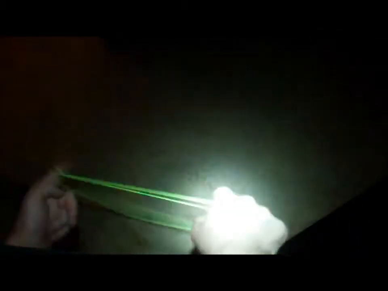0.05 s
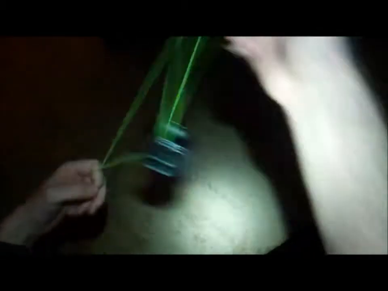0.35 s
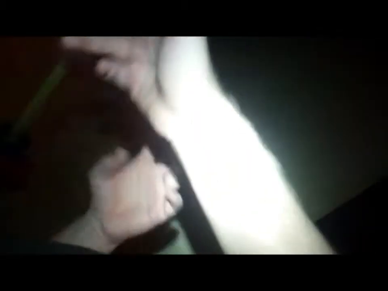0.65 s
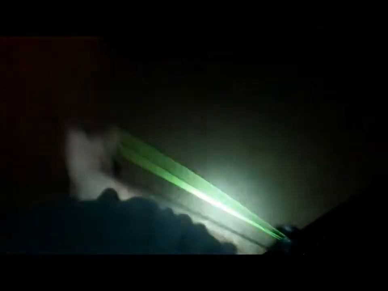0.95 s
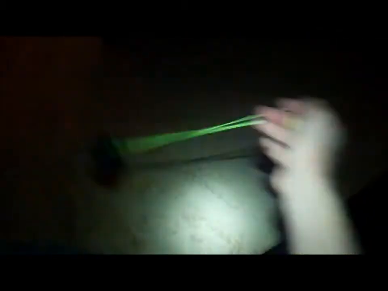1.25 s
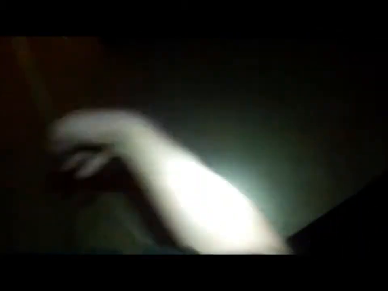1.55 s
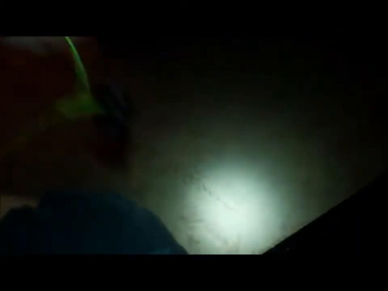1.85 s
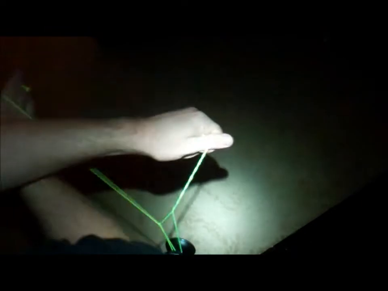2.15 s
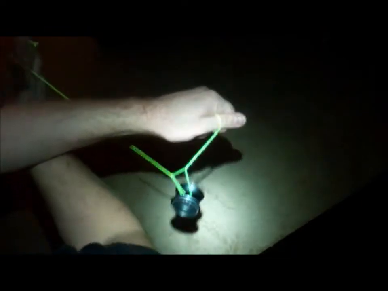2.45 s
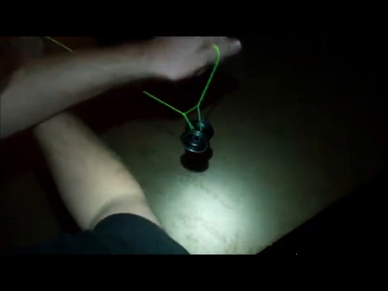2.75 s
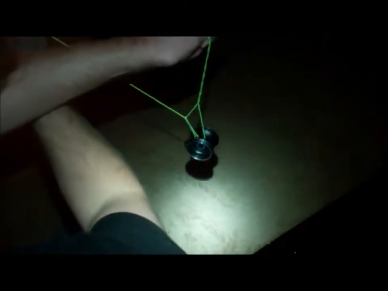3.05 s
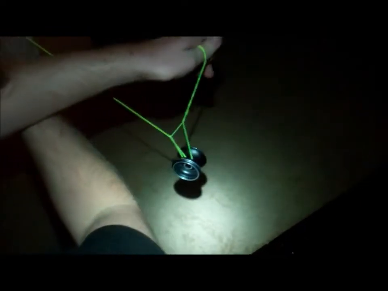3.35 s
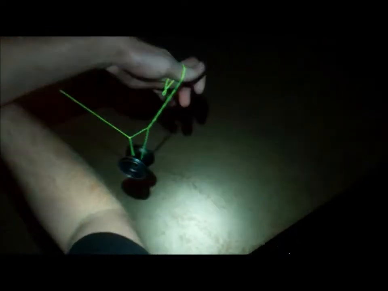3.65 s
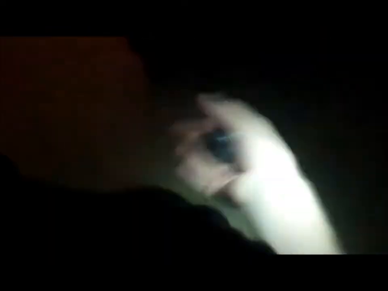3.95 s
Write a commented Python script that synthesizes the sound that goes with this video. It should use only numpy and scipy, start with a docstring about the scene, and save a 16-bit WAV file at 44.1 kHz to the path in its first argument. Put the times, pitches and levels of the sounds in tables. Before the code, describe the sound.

Close to the microphone in a faintly humming room, a metal yo-yo whirs unevenly on its string, swings free with soft bearing chatter, then lands and hisses steadily. It stops abruptly, followed by light taps and a bump.

```python
"""A metal yo-yo in a quiet, humming room, close to a stereo microphone pair and to its left.
First come string tricks: the string rubs in the gap with a grainy hiss whose resonances move with the
wraps, slides over the fingers and makes the rims ring. From 1.3 s the yo-yo swings free: only the
bearing chatters and the rims sing. At 1.9 s it lands on the string with a chirp and hangs there hissing,
until the sound stops short at 3.8 s. Two light taps and a small bump follow."""
import sys
import numpy as np
from scipy import signal
from scipy.fft import rfft, irfft
from scipy.io import wavfile
from scipy.ndimage import uniform_filter1d

SR = 44100
rng = np.random.default_rng(int(sys.argv[2]) if len(sys.argv) > 2 else 0)


def file_out(sig):
    """Save sig as 16-bit WAV at sys.argv[1]."""
    # one column per channel
    cols = np.atleast_2d(sig).T
    # limit, then scale
    lim = np.clip(cols, -1, 1)
    pcm = np.round(lim * 32767).astype(np.int16)
    wavfile.write(sys.argv[1], SR, pcm)


N = 176400
T = np.arange(N) / SR
BIN_HZ = np.arange(N // 2 + 1) * SR / N
SIDES = np.array([[1], [-1]])   # left, right


def from_db(db):
    """Decibels to gain."""
    return 10 ** (np.asarray(db) / 20)


def unit_rms(x):
    """Scale to an rms of 1."""
    return x / np.sqrt(np.mean(x ** 2) + 1e-20)


def in_time(rows):
    """Each column after time_s, interpolated to every sample."""
    times, *columns = np.transpose(rows)
    return [np.interp(T, times, column) for column in columns]


def at_hz(spectrum, hz):
    """Read a spectrum on a log-frequency axis."""
    freqs, values = np.transpose(spectrum)
    return np.interp(np.log(hz + 1e-9), np.log(freqs), values)


def gate(start_s, end_s, rise_s, fall_s):
    """Straight attack, hold and release."""
    return np.clip((T - start_s) / rise_s, 0, 1) * np.clip((end_s - T) / fall_s, 0, 1)


def noise():
    """Two unrelated white noises."""
    return rng.standard_normal((2, N))


def drift(rate_hz):
    """Smooth random wander, rms 1."""
    return unit_rms(irfft(rfft(rng.standard_normal(N)) / (1 + (BIN_HZ / rate_hz) ** 2), N))


def grain(rate_hz, depth_db):
    """A randomly flickering gain with capped peaks."""
    return from_db(depth_db * np.minimum(drift(rate_hz), 2))


def narrow_noise(hz, half_width_hz):
    """A randomly driven resonance, steady or gliding; rms 1."""
    phase = 2 * np.pi * np.cumsum(hz + np.zeros(N)) / SR
    return drift(half_width_hz) * np.cos(phase) + drift(half_width_hz) * np.sin(phase)


def moving_resonance(hiss, hz, height_db, width_hz=1300, block=256):
    """Raise or lower a band of the hiss whose centre moves block by block."""
    band, state = np.zeros_like(hiss), np.zeros((2, 2))
    radius = np.exp(-np.pi * width_hz / SR)
    b = np.array([1, 0, -1]) * (1 - radius ** 2) / 2
    for i in range(0, N, block):
        a = [1, -2 * radius * np.cos(2 * np.pi * hz[i] / SR), radius ** 2]
        band[:, i:i + block], state = signal.lfilter(b, a, hiss[:, i:i + block], zi=state)
    return hiss + (from_db(height_db) - 1) * band


# Balance at the microphone pair: freq_hz, left_over_right_db
MIC_BALANCE = [(100, 4.5), (1000, 3.5), (2500, 3.5), (5000, 8), (7000, 7.5), (8300, 14.5), (9600, 11.5),
               (10800, 16), (12000, -9), (14000, 1)]
def pan(hz):
    """Left and right gains at a frequency, averaging 1."""
    gains = from_db(SIDES * at_hz(MIC_BALANCE, hz) / 2)
    return gains / gains.mean(0)


# How alike the two microphones sound: freq_hz, correlation
MIC_LIKENESS = [(30, 0.29), (120, 0.64), (280, 0.47), (550, 0.28), (1200, 0.29), (5000, 0.51), (7000, 0.64),
                (9500, 0.11), (13000, 0.73)]
def at_microphones(pair, colour):
    """Colour two unrelated noises and spread them over the microphones as mid and side."""
    alike = np.clip(at_hz(MIC_LIKENESS, BIN_HZ), 0, .99)
    mid, side = rfft(pair)
    spread = np.sqrt((1 + alike) / 2) * mid + np.sqrt((1 - alike) / 2) * side * SIDES
    tone = unit_rms(from_db(at_hz(colour, BIN_HZ)))
    return irfft(tone * pan(BIN_HZ) * spread, N)


# Air of the room: freq_hz, relative_db
AIR_COLOUR = [(25, -1.5), (55, -2), (85, -2), (130, -0.5), (200, 0.5), (320, -1.5), (450, -3), (800, -5),
              (1400, -4.5), (2000, -8.5), (3500, -8), (7000, -9.5), (11000, -15.5), (14000, -43)]
# Its rise and fall: time_s, level_db
AIR_LEVEL = [(0, -62.5), (.4, -57.5), (1.0, -56.5), (1.6, -54), (2.7, -53.5), (3.4, -55.5), (3.78, -55.5),
             (3.83, -61.5), (4, -58.5)]
# Mains and fan hum: pitch_hz, average_level_db
HUM_TONES = [(55, -81), (120, -66), (162, -74), (256, -67), (298, -79), (323, -74.5)]
def room():
    """Dull air noise and the hum of mains and fan swell and sink together around the microphones."""
    level_db, = in_time(AIR_LEVEL)
    hum = 0
    for hz, db in HUM_TONES:
        amplitude = np.sqrt(2) * from_db(db + drift(5.5))
        hum += amplitude * np.sin(2 * np.pi * hz * T + 0.34 * drift(1.4)) * pan(hz)
    air = at_microphones(noise(), AIR_COLOUR) * from_db(level_db)
    return air + hum * from_db(level_db - level_db.mean())


def string_rub(path, low_path, colour, low_width_hz):
    """Fibres catch on the spinning gap: grainy hiss, chopped by the spin, with two moving resonances."""
    level_db, high_hz, pan_db, high_db = in_time(path)
    low_hz, low_db = in_time(low_path)
    flutter_hz = 372.6 - 9.9 * T + 4 * drift(4.26)   # sags as the spin slows
    flutter = 1 + 0.12 * np.sin(2 * np.pi * np.cumsum(flutter_hz) / SR)
    grains = unit_rms(grain(rate_hz=700, depth_db=2) * flutter)
    hiss = moving_resonance(at_microphones(noise(), colour), high_hz, high_db)
    hiss = moving_resonance(hiss, low_hz, low_db, low_width_hz)
    hiss *= from_db(SIDES * (pan_db - 9) / 2)   # 9 dB keeps the usual lean to the left
    running_rms = np.sqrt(uniform_filter1d(hiss.mean(0) ** 2, size=2000))
    return hiss / running_rms * grains * from_db(level_db)


# Rub of the first and second trick: time_s, level_db, resonance_hz, pan_db, height_db
FIRST_TRICK = [(0.0, -49, 9000, 11, 14), (0.12, -52, 9300, 17, 24), (0.135, -52, 8900, 11, 9),
               (0.16, -45.5, 8900, 8, 6), (0.21, -47, 8900, 9, -12), (0.265, -43.5, 8200, 10, 12),
               (0.31, -45.5, 7760, 10, 10), (0.355, -40, 8950, 9, 12.5), (0.395, -43.5, 7640, 8, 2),
               (0.436, -42.5, 7300, 6.5, 11), (0.472, -53, 7330, 9, 5), (0.51, -44.5, 7400, 10, 0),
               (0.58, -44.5, 7500, 9, 5), (0.62, -42.5, 9200, 10, 5), (0.65, -42, 9200, 8, 1),
               (0.683, -39, 9400, 10, 12.5), (0.726, -42.5, 6660, 8, 2), (0.784, -56, 7900, 15, 13),
               (0.82, -56, 6800, 7, 8)]
SECOND_TRICK = [(0.82, -55, 6750, 8.5, 3), (0.86, -47, 6900, 9.3, 12), (0.906, -44.5, 7500, 6, 11),
                (0.97, -43, 7300, 6.2, 10), (1.046, -40, 8350, 8.4, 7), (1.12, -42, 8200, 7.6, 12),
                (1.18, -43.5, 9100, 7.5, 6.5), (1.226, -45.5, 9000, 7.1, 7), (1.282, -35.5, 8350, 10, 9.2),
                (1.33, -51, 7630, 5.3, 2.2)]
# Its lower resonance: time_s, resonance_hz, height_db
TRICK_LOW_RESONANCE = [(0.12, 7500, -5), (0.17, 7200, -6), (0.2, 6200, 4), (0.24, 5000, 4),
                       (0.35, 4940, 11.5), (0.44, 5300, -11), (0.49, 5100, 5), (0.54, 5200, 9),
                       (0.62, 5440, -2), (0.68, 5600, -1), (0.735, 5300, 3), (0.83, 6000, 0),
                       (0.9, 6460, 3), (0.96, 6200, 10), (1.0, 4960, 6), (1.06, 5100, 3), (1.12, 6230, 7),
                       (1.19, 5800, -4), (1.28, 6900, 7)]
# Its hiss: freq_hz, relative_db
TRICK_HISS = [(1000, -20.5), (2200, -13), (3000, -6), (4000, -7.5), (5000, 0.5), (5900, -3), (7800, -1.5),
              (9300, -1), (10100, -5.5), (11000, -14), (12300, -20), (14000, -31)]
def tricks():
    """The string rubs in the gap through two tricks, its resonances moving with the wraps."""
    path = list(FIRST_TRICK) + list(SECOND_TRICK)[1:]
    fade = np.clip((path[-1][0] - T) / 0.019, 0, 1)
    return string_rub(path, TRICK_LOW_RESONANCE, TRICK_HISS, low_width_hz=690) * fade


# Rolling of the bearing: time_s, relative_db, resonance_hz
BEARING_ROLL = [(0, -46, 9100), (.7, -48.5, 9100), (.82, -54.5, 9000), (1.3, -47, 9100), (1.5, -45, 9200),
                (1.62, -46.5, 7800), (1.75, -44.5, 7300), (1.85, -46.5, 7600), (1.91, -54, 7600),
                (2.0, -47, 7900), (3.8, -46.5, 9100)]
# Its hiss: freq_hz, relative_db
BEARING_HISS = [(1000, -24), (2200, -11.5), (3000, -6), (4000, -10), (5000, -3.5), (5800, -5.5), (7200, -1),
                (8400, -0.5), (9200, 3), (10000, -5), (11000, -22), (14000, -23)]
# Its sharp clicks: start_s, relative_db
BEARING_CLICKS = [(0.0352, -34), (0.156, -30), (0.4309, -39), (0.7623, -25), (1.389, -32), (1.4206, -37),
                  (1.4446, -38), (1.4654, -22), (1.487, -34), (1.5119, -41), (1.526, -27), (1.5396, -22),
                  (1.5794, -22), (1.6296, -30), (1.7453, -23), (1.8624, -25.5)]
# Their colour: freq_hz, relative_db
CLICK_SPECTRUM = [(1000, -19), (4000, -19), (7200, 3), (9200, 1), (11000, -20), (14000, -28)]
def bearing(roll_gain_db=-3.5, click_gain_db=-9, click_decay_s=0.00087):
    """The balls roll with a softly chattering hiss and small clicks."""
    level_db, hz = in_time(BEARING_ROLL)
    chatter = unit_rms(grain(rate_hz=253, depth_db=3.5))
    hiss = moving_resonance(at_microphones(noise(), BEARING_HISS), hz, height_db=0.5)
    roll = hiss / hiss.mean(0).std() * chatter * from_db(level_db + roll_gain_db)
    clicks = sum(from_db(db + click_gain_db) * (T >= start) * np.exp(-np.abs(T - start) / click_decay_s)
                 for start, db in BEARING_CLICKS)
    return roll + at_microphones(clicks * noise(), CLICK_SPECTRUM)


# String passing over the fingers: peak_s, rise_s, fall_s, level_db
SWISHES = [(.04, 0.086, 0.063, -51.5), (.34, 0.024, 0.015, -49.5), (.622, 0.011, 0.0091, -44.5),
           (.683, 0.013, 0.011, -43.5), (1.265, 0.078, 0.021, -44.5), (1.946, .011, 0.021, -42)]
# Their colour: freq_hz, relative_db
SWISH_COLOUR = [(500, -23.5), (1200, -10.5), (1700, -9.5), (2700, 1), (3600, -1.5), (5000, -19), (9000, 1),
                (13000, -23)]
# Zips of the running string: start_s, length_s, start_hz, end_hz, half_width_hz, level_db
STRING_ZIPS = [(0, 0.099, 1710, 1636, 49.7, -57.5), (.13, 0.12, 1630, 1525, 95, -61.5),
               (0.319, 0.084, 1250, 1084, 90, -62.5), (0.666, 0.04, 1750, 1655, 230, -49),
               (1.021, 0.2, 1134, 1234, 45, -64), (1.145, 0.1496, 1420, 1533, 94.5, -54),
               (2.693, 0.81, 1247, 1253, 30, -68), (3.452, 0.31, 1480, 1457, 60, -69.5)]
def finger_slides():
    """String runs over skin: short swishes, lower than the rub, and narrow gliding zips."""
    swell = sum(from_db(db) * np.exp(-((T - peak) / np.where(T < peak, rise, fall)) ** 2 / 2)
                for peak, rise, fall, db in SWISHES)
    sound = at_microphones(noise() * swell * from_db(2 * drift(400)), SWISH_COLOUR)
    for start, length, start_hz, end_hz, half_width, db in STRING_ZIPS:
        span = [start, start + length]
        tone = narrow_noise(np.interp(T, span, [start_hz, end_hz]), half_width)
        sound += tone * from_db(db) * gate(*span, rise_s=0.21 * length, fall_s=0.037) * pan(start_hz)
    return sound


# Modes of the metal rims: pitch_hz, width_hz, level_db, share_of_friction_swing
RIM_RESONANCES = [(3413, 66, -63, 0.35), (4460, 61, -60, 0.59), (5044, 110, -59, 0.3),
                  (9000, 260, -71, 0.18)]
def rim_song(friction):
    """Friction keeps the rim modes singing, louder as it grows."""
    power = uniform_filter1d(unit_rms(friction.mean(0)) ** 2, size=900)
    swing_db = 10 * np.log10(power.clip(1e-6))
    return sum(narrow_noise(hz, width / 2) * from_db(db + share * swing_db) * pan(hz)
               for hz, width, db, share in RIM_RESONANCES)


# String brushing a rim: start_s, length_s, level_db
RIM_BRUSHES = [(0.022, 0.036, -53.5), (.11, .03, -59), (0.187, .05, -62), (0.298, 0.022, -57),
               (0.34, 0.039, -53), (0.518, .02, -56), (0.667, 0.022, -51), (0.787, 0.044, -63),
               (0.94, 0.019, -53.5), (1.03, 0.029, -57), (1.11, .045, -54), (1.163, 0.013, -48.5),
               (1.198, 0.011, -44.5), (1.25, .035, -52), (1.946, .025, -54.5), (2.06, .03, -58),
               (2.11, 0.042, -52), (2.18, 0.033, -61), (2.237, 0.027, -62), (3.297, 0.1, -56),
               (3.467, .02, -55), (3.547, 0.019, -52.5), (3.673, 0.017, -69)]
def rim_flares(rise_s=0.0066, t60_s=0.11):
    """Each brush of the string bows the lowest rim mode into a wavering note that rings out."""
    hz = RIM_RESONANCES[0][0]
    swell = 0
    for start, length, db in RIM_BRUSHES:
        decay_db = 60 * np.maximum(T - start - length, 0) / t60_s
        swell += from_db(db - decay_db) * np.clip((T - start) / rise_s, 0, 1)
    phase = 2 * np.pi * np.cumsum(hz + 22.1 * drift(44.4)) / SR
    chatter = from_db(2 * drift(90))
    return np.sqrt(2) * swell * chatter * np.sin(phase) * pan(hz)


# Rub while hanging on the string: time_s, relative_db, resonance_hz, pan_db, height_db
HANG_RUB = [(1.935, -36, 7600, 8.4, 3), (1.98, -42, 7060, 11, 18), (2.025, -39.5, 6900, 6.9, 23),
            (2.06, -39, 7240, 7.1, 10), (2.115, -39, 8240, 7, 17), (2.18, -39.5, 7340, 6.9, 4),
            (2.275, -39.5, 7000, 7.9, 22.5), (2.35, -39, 6850, 7.9, 2.5), (2.415, -40.5, 6400, 8.8, 5.5),
            (2.515, -36.5, 6900, 6.7, 8), (2.581, -38.5, 6700, 8.1, 9.5), (2.66, -38, 6840, 7.6, 11),
            (2.73, -37.5, 6500, 9.8, 10), (2.805, -36.5, 6500, 8.9, 13), (2.83, -38.5, 6500, 8.2, 9),
            (2.885, -37.5, 6300, 8.7, 6), (2.93, -40, 6800, 8.3, -2), (3.079, -40.5, 7140, 8.6, 0.5),
            (3.235, -39.5, 7360, 8.4, 6.5), (3.32, -40, 7200, 9.5, 4), (3.39, -41, 7000, 9, 6),
            (3.44, -41, 6670, 8.3, 12), (3.545, -38.5, 7200, 8.5, 1), (3.607, -42.5, 7450, 8.2, 9),
            (3.649, -42.5, 6760, 8.2, 1), (3.7, -40.5, 7400, 9.6, -4), (3.757, -44.5, 7260, 9, -9),
            (3.8, -42, 7350, 10, 7)]
# Its lower resonance: time_s, resonance_hz, height_db
HANG_LOW_RESONANCE = [(1.94, 5000, 3), (2.06, 5200, 2), (2.28, 5670, -5.5), (2.39, 5700, 4),
                      (2.522, 5800, 2.5), (2.62, 5900, -1), (2.8, 5760, 3), (2.95, 5600, 5),
                      (3.08, 5300, 7), (3.2, 5340, 7.5), (3.342, 5500, 7), (3.43, 5400, -0.5),
                      (3.8, 5500, 3)]
# Its hiss: freq_hz, relative_db
HANG_HISS = [(1000, -28.5), (2200, -17.5), (3200, -18.5), (4000, -6.5), (4900, -1.5), (6000, -0.5),
             (7500, 1), (8600, -4), (9600, 4.5), (10400, -6), (11300, -15), (14000, -34)]
def hang(gain_db=1):
    """The yo-yo spins on the string, which rubs steadily in the gap."""
    return string_rub(HANG_RUB, HANG_LOW_RESONANCE, HANG_HISS, low_width_hz=1100) * from_db(gain_db)


# Glides of the landing chirp: start_hz, end_hz, half_width_hz, level_db
CHIRP_GLIDES = [(1640, 2300, 77, -51.5), (2350, 3100, 130, -46), (2790, 2200, 190, -53)]
def landing_chirp(start_s=1.938, length_s=0.0406):
    """The string snaps taut under the landing yo-yo with a short chirp."""
    span = [start_s, start_s + length_s]
    chirp = 0
    for start_hz, end_hz, half_width, db in CHIRP_GLIDES:
        glide_hz = np.interp(T, span, [start_hz, end_hz])
        chirp += narrow_noise(glide_hz, half_width) * from_db(db) * pan(start_hz)
    return chirp * gate(*span, rise_s=0.0058, fall_s=0.035)


# Light taps on the rim: start_s, level_db
RIM_TAPS = [(3.841, -53.5), (3.946, -51.5)]
def rim_taps(pitch_hz=3440, t60_s=0.1):
    """Each tap rings the rim with one fading tone."""
    ring = 0
    for start, db in RIM_TAPS:
        age = np.maximum(T - start, 0)
        ring += from_db(db - 60 * age / t60_s) * np.sin(2 * np.pi * pitch_hz * age)
    return ring * pan(pitch_hz)


# Colour of the bump: freq_hz, relative_db
BUMP_COLOUR = [(300, -8), (2000, -8), (4400, -1.5), (6000, -8), (8500, 0), (12000, -22)]
def bump():
    """A small bump, heard as a brief, bright burst of noise."""
    burst = noise() * from_db(-45.5) * gate(3.983, 3.996, rise_s=0.0011, fall_s=0.0043)
    return at_microphones(burst, BUMP_COLOUR)


def scene():
    """Tricks, free swing, hang on the string and last ticks, over the tone of the room."""
    landing_s, stop_s, stop_fade_s = 1.922, 3.802, 0.00045
    on_string = gate(landing_s, stop_s, rise_s=0.019, fall_s=stop_fade_s)
    spinning = np.clip((stop_s - T) / stop_fade_s, 0, 1)
    friction = tricks() + hang() * on_string + bearing()
    yoyo = friction + rim_song(friction) + rim_flares() + finger_slides() + landing_chirp()
    return yoyo * spinning + rim_taps() + bump() + room()


def record(dry):
    """Both microphone channels are cut steeply at the top of the treble."""
    cutoff_hz = 14250
    return signal.sosfilt(signal.ellip(12, .1, 70, cutoff_hz, fs=SR, output="sos"), dry)


dry = scene()
out = record(dry)
file_out(out)
```